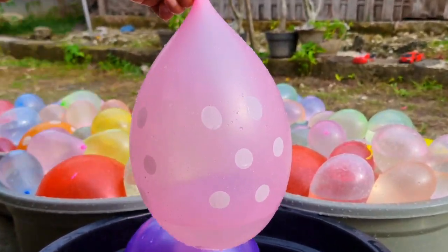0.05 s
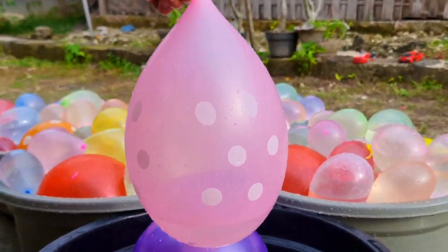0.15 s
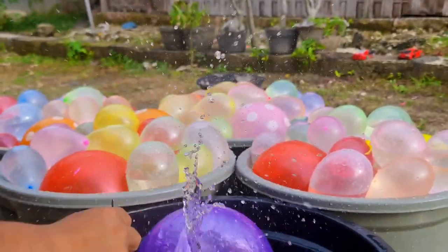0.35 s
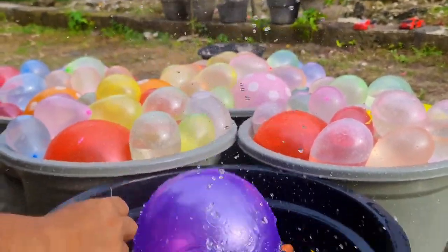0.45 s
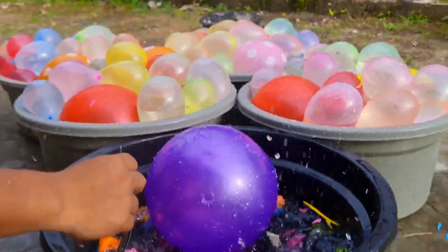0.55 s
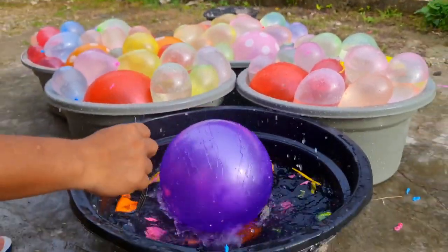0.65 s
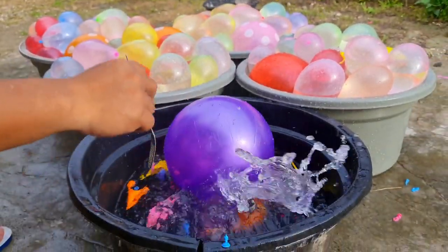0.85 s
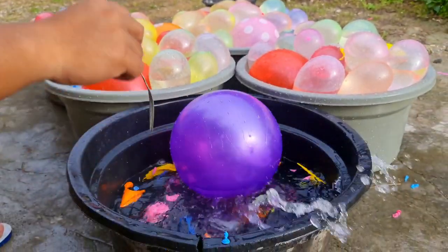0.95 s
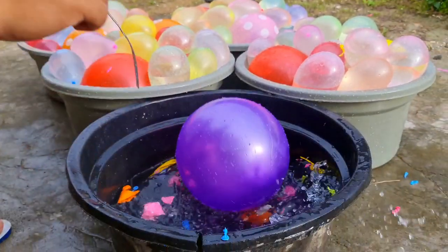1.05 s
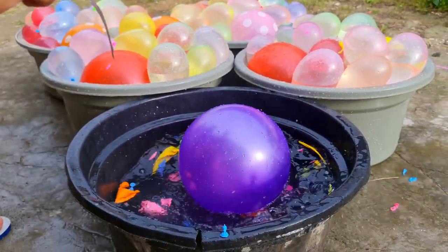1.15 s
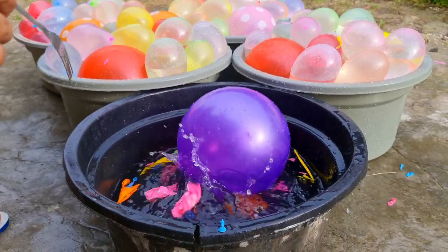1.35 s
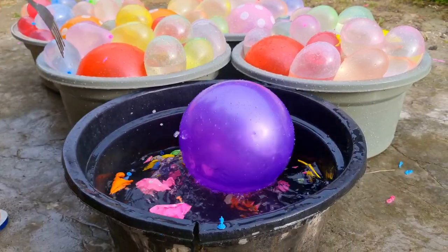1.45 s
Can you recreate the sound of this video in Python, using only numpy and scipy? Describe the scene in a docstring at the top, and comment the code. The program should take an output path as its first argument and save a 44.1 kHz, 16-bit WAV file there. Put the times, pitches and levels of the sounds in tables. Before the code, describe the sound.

Outdoors in a quiet yard, a pricked water balloon tears with a loud clipped pop; its water rushes out, spatters on plastic and ground, bubbles and drips, and a rubber scrap softly thumps an air-filled balloon.

```python
"""Over distant engine drone, faint yard noise and low wind, a pricked water balloon tears and pops in clipped snaps.
Its water gushes out as rumble, roar and hiss: shaped noise and clicks under drawn levels.
It then slaps, splashes, bubbles and drips: swarms of tiny rising sines, plus rumble on an air balloon.
Late on, a scrap of rubber lands on the air balloon, which rings as dying sines. The engine ends lower in pitch.
"""
import sys
import numpy as np
from scipy import signal
from scipy.fft import rfft, irfft
from scipy.io import wavfile
from scipy.ndimage import uniform_filter1d

SR = 44100
rng = np.random.default_rng(int(sys.argv[2]) if len(sys.argv) > 2 else 0)


def bounce(signal):
    """Save signal as a 16-bit WAV file at the path given by the first command-line argument."""
    frames = np.transpose(np.atleast_2d(signal))
    limited = np.clip(frames, -1, 1)
    pcm = np.round(limited * 32767).astype(np.int16)
    wavfile.write(sys.argv[1], SR, pcm)


N = 66150

# spectrum of the splash: freq_hz, rel_db_per_hz
SPLASH_SPECTRUM = [(180, -39), (300, -21), (415, -19.5), (562, -2), (662, -8.5), (887, -5), (1040, -8),
                   (1490, -5), (4000, -16), (5200, -43), (8800, -120)]
# spectrum of spray and hiss: freq_hz, rel_db_per_hz
SPRAY_SPECTRUM = [(880, -20.5), (1500, -9.5), (2150, -15), (3280, -9.5), (4070, -9), (5300, -9),
                  (6200, -8.5), (7990, -15.5), (9500, -16), (12700, -10.5), (15000, -14), (16000, -17.5)]
# spectrum of the water's rumble: freq_hz, rel_db_per_hz
RUMBLE_SPECTRUM = [(35, -24), (60, -0.5), (87, 0.5), (385, -3), (428, -25), (472, -7), (600, -16),
                   (780, -48), (1320, -120)]

# SHARE: power fraction of grains or drops, the rest being plain noise
GRAINS_PER_S, GRAIN_SPREAD_DB, GRAIN_CYCLES, GRAIN_SHARE = 5000, 3, 4, 0.75
DROPS_PER_S, DROP_SPREAD_DB, DROP_SHARE = 3300, 3, 0.75
SPATTER_CYCLES = 2.4
NEAR_LEAN_DB = -3.2


def amp(db):
    """Decibels to amplitude."""
    return 10 ** (np.asarray(db) / 20)


def evened(x):
    """Scales to unit RMS."""
    return x / np.sqrt(np.mean(x ** 2) + 1e-20)


def read(points, hz):
    """Interpolates a table over log frequency."""
    f, value = np.transpose(points)
    return np.interp(np.log(hz + 1), np.log(f + 1), value)


def add(mix, start_s, sound):
    """Adds a sound in place, cut at the end of the mix."""
    part = mix[..., round(start_s * SR):][..., :sound.shape[-1]]
    part += sound[..., :part.shape[-1]]


def ring(modes, length_s, opposed=False):
    """Sum of dying sines; if opposed, every other mode starts in the opposite sense."""
    t = np.arange(round(length_s * SR)) / SR
    out = np.zeros(len(t))
    for k, (hz, db, t60_s) in enumerate(modes):
        sense = (-1) ** (k * opposed)
        out += sense * amp(db - 60 * t / t60_s) * np.sin(2 * np.pi * hz * t)
    return out


def coloured(a, b, spectrum):
    """Colours a source and spreads it over two channels; b is heard on the right only."""
    # likeness of the channels: freq_hz, left_right_correlation
    likeness = [(60, 1), (180, 0.93), (550, 0.093), (1650, 0.069), (4970, 0.0028), (15000, 0.29)]
    # level difference of the channels: freq_hz, left_minus_right_db
    side_lean = [(60, -12), (180, -2.5), (550, -4), (1650, 0.5), (4970, -2), (15000, -3.5)]
    hz = np.fft.rfftfreq(N, 1 / SR)
    same = read(likeness, hz)
    half_lean = amp(read(side_lean, hz) / 2)
    a, b = rfft(a), rfft(b)
    left = a * half_lean
    right = (same * a + np.sqrt(1 - same ** 2) * b) / half_lean
    return evened(irfft(np.array([left, right]) * amp(read(spectrum, hz)), N))


def sparse(per_s, spread_db):
    """Random two-channel clicks of either sign, a few of them large."""
    size = amp(spread_db * np.minimum(rng.exponential(1, (2, N)), 4))
    sign = rng.choice([-1., 1.], (2, N))
    return size * sign * (rng.random((2, N)) < per_s / SR)


def blend(grains, share):
    """Mixes grains with white noise at a given power share."""
    return np.sqrt(share) * evened(grains) + np.sqrt(1 - share) * rng.standard_normal((2, N))


def bubble(hz, rise_oct_per_s, length_s):
    """An air bubble: a sine that swells, dies and climbs in pitch."""
    peak_at = 0.44  # fraction of length_s
    t = np.arange(round(1.7 * length_s * SR)) / SR
    u = (t / (peak_at * length_s)) ** 2
    phase = 2 * np.pi * np.cumsum(hz * 2 ** (rise_oct_per_s * t)) / SR
    return np.sqrt(u * np.exp(1 - u)) * np.sin(phase)


def droplets(per_s, spread_db, cycles, lo_hz, hi_hz):
    """Random tiny bubbles of 24 pitches, each lasting a set number of cycles."""
    clicks = sparse(per_s, spread_db)
    kind = rng.integers(0, 24, (2, N))
    out = np.zeros((2, N))
    for k, hz in enumerate(np.geomspace(lo_hz, hi_hz, num=24)):
        grain = np.sqrt(hz) * bubble(hz, hz / 60, cycles / hz)
        out += signal.oaconvolve(clicks * (kind == k), grain[None], axes=1)[:, :N]
    return out


def tearing_skin():
    """Each tear jolts the skin and water into low ringing, with a short high ring of snapping rubber."""
    # tears: start_s, level_db, sense (only its sign counts: push +, pull -), snap_rel_db
    tears = [(0.2247, -26, 0.5, -10.5), (.231, -14, -1, -10), (0.2339, -12.5, 1, -16),
             (0.2378, -11.5, -1, -2.5), (0.2411, -3, 1, -16), (0.2429, -2, -1, -1.5), (0.2444, -4.5, 1, 6),
             (0.2465, -7, 1, 6), (0.25, -21, 1, 4), (0.259, -21, -1, -8), (.261, -24.5, 1, 7.5),
             (0.264, -20, 1, -8), (0.2786, -16.5, 1, -3), (.287, -15.5, 1, -7)]
    # ringing of skin and water: freq_hz, rel_db, t60_s
    burst_modes = [(73.4, -7.5, 0.093), (188, -5, 0.019), (408, -3.5, .02), (550, -9, 0.018)]
    # ringing of the snapping rubber: freq_hz, rel_db, t60_s
    snap_modes = [(960, -9.5, 0.0084), (1300, -2, 0.011), (1620, -12.5, 0.0088), (3260, -11, 0.0065)]
    out = np.zeros(N)
    burst, snap = ring(burst_modes, 0.15), ring(snap_modes, 0.15)
    for start_s, db, sense, snap_db in tears:
        add(out, start_s, np.sign(sense) * amp(db) * (burst + amp(snap_db) * snap))
    return out


def gush():
    """Water leaves the skin as three bands of clicks and noise: rumble, roar and hiss."""
    # gush levels: time_s, rumble_db, roar_db, hiss_db
    gush_levels = [(0.218, -37.5, -47, -39.5), (0.234, -17, -22.5, -23.5), (0.244, -10.5, -15.5, -9.5),
                   (0.258, -26, -27.5, -17.5), (0.278, -24, -24, -21), (0.308, -26, -34, -30.5),
                   (0.41, -40, -38.5, -41), (0.43, -62.5, -43, -39)]
    # spectrum of the roar: freq_hz, rel_db_per_hz
    roar_spectrum = [(290, -40), (500, -2.5), (687, -4.5), (764, -21), (913, -4.5), (1070, -5.5),
                     (1530, -4.5), (3500, -9), (4550, -39), (7700, -120)]
    time_s, *levels_db = np.transpose(gush_levels)
    t = np.arange(N) / SR
    out = np.zeros((2, N))
    for db, spectrum in zip(levels_db, (RUMBLE_SPECTRUM, roar_spectrum, SPRAY_SPECTRUM)):
        level = amp(np.interp(t, time_s, db, left=-120, right=-120))
        source = blend(sparse(DROPS_PER_S, DROP_SPREAD_DB), DROP_SHARE)
        out += level * coloured(*source, spectrum)
    return out


def slaps():
    """Water slaps hard ground and plastic: short droplet spatters, each with its own side, treble and body."""
    # slaps: start_s, rel_db, t60_s, pan_left_minus_right_db, treble_rel_db, body_rel_db
    slap_events = [(0.3636, -20.5, 0.07, -4, -9, -3), (0.4344, -20, 0.05, -4, -17, 4.5),
                   (0.4402, -21.5, 0.07, -5, -14, 4), (0.4483, -12.5, 0.063, 10.5, -12, -1.5),
                   (0.4556, -11, 0.065, -2, -5.5, -0.5), (0.5102, -21, 0.036, 2, 4, 1),
                   (0.5516, -15.5, 0.044, 2, -8.5, 0), (0.5616, -23.5, 0.045, 4, -18, 9),
                   (0.5836, -19, 0.046, 9, -12, -1), (0.618, -19.5, 0.068, 0, -9, -7),
                   (0.6438, -19, 0.059, 5, -7, -14), (0.6834, -13, 0.048, 5.5, -27, -3.5),
                   (0.699, -22, 0.045, 7, -20, -5), (0.724, -26, 0.077, 1.0, -16, -8),
                   (0.8844, -46, 0.04, -13, 6, -2), (0.9169, -27.5, 0.05, 1, -4, 0.5),
                   (0.9483, -36, 0.05, -2, 2, -7), (0.9692, -33.5, 0.047, 1.0, -17, 1.5),
                   (0.989, -26.5, 0.088, 6, -1.5, -14), (1.0087, -25, 0.073, -4, 1, -5),
                   (1.0224, -22, 0.052, 8.5, -9, -15), (1.0594, -31.5, 0.046, 0, -9, -5),
                   (1.0859, -41, 0.05, 2, -3, -8), (1.1154, -24.5, 0.054, -12, -7.5, -29),
                   (1.125, -28, 0.043, 13, 2, -29), (1.1476, -19.5, 0.048, -6.5, -3, -29),
                   (1.1543, -26.5, 0.041, -1, -11, -29), (1.1615, -27, 0.058, -1.5, 2, -23),
                   (1.2337, -26, 0.059, 2, -5.5, 4.5), (1.289, -28.5, 0.058, 5, -8, -12),
                   (1.2986, -35, 0.054, -4, -2, -12), (1.377, -35, 0.067, 6, -5, -7),
                   (1.396, -30, 0.05, -0.5, -3.5, -9), (1.412, -34.5, 0.059, 7, -6, -7),
                   (1.45, -37, 0.046, -2.0, -16, 0.5)]
    trim_db, rise_s = -7.5, 0.0028
    tick_db, tick_s = -1.5, 0.0006  # first contact
    spatter_per_s, spread_db, share, treble_hz = 4000, 4, 0.77, 8200
    env = np.zeros((3, 2, N))  # dull part, treble, body
    t = np.arange(SR // 5) / SR
    onset = np.minimum(t / rise_s, 1) + amp(tick_db) * np.exp(-t / tick_s)
    for start_s, db, t60_s, pan_db, treble_db, body_db in slap_events:
        shape = onset * amp(db + trim_db - 60 * t / t60_s)
        shape = shape * amp([[pan_db / 2], [-pan_db / 2]])
        add(env, start_s, shape * amp([[[0]], [[treble_db]], [[body_db]]]))
    spatter = droplets(spatter_per_s, spread_db, SPATTER_CYCLES, 2360, 15700)
    spatter = coloured(*blend(spatter, share), SPRAY_SPECTRUM)
    lowpass = 1 / (1 + (np.fft.rfftfreq(N, 1 / SR) / treble_hz) ** 8)
    dull = irfft(rfft(spatter) * lowpass, N)
    treble = evened(spatter - dull)
    body = droplets(GRAINS_PER_S, spread_db, GRAIN_CYCLES, 602, 3080)
    body = coloured(*blend(body, share), SPLASH_SPECTRUM)
    return env[0] * dull + env[1] * treble + env[2] * body


def falling_water():
    """Tiny bubbles in the splash with a pool resonance, ticking spray, and rumble on the air balloon."""
    # falling water levels: time_s, splash_db, rumble_db, spray_db
    water_levels = [(.4, -43, -49, -43), (.47, -27.5, -34, -33.5), (.53, -30.5, -38.5, -36),
                    (.58, -27, -37, -34.5), (.62, -28.5, -40.5, -32.5), (.708, -29, -44.5, -34),
                    (0.738, -29.5, -42, -43.5), (.77, -43, -53, -52), (.83, -51, -56, -52),
                    (.9, -53, -55.5, -49.5), (.95, -53, -57, -48.5), (.985, -42.5, -50, -43.5),
                    (1.03, -43, -41.5, -41.5), (1.05, -45.5, -48, -44.5), (1.08, -45.5, -52.5, -50.5),
                    (1.11, -51.5, -58, -45), (1.165, -55, -62, -45), (1.192, -56, -68, -42.5),
                    (1.205, -57, -62, -50), (1.228, -53, -60, -46.5), (1.27, -48.5, -56, -56),
                    (1.34, -60.5, -52.5, -64), (1.4, -58, -65, -55.5), (1.5, -58, -53, -56.5)]
    gurgles_per_s, gurgle_cycles, gurgle_db = 400, 10, -1
    pool_hz, pool_width_hz, pool_db = 570, 110, -14.5
    time_s, splash_db, rumble_db, spray_db = np.transpose(water_levels)
    t = np.arange(N) / SR

    def level(db):
        """Interpolates a level in dB, silent before the first point."""
        return amp(np.interp(t, time_s, db, left=-120))

    grains = evened(droplets(GRAINS_PER_S, GRAIN_SPREAD_DB, GRAIN_CYCLES, 354, 3980))
    gurgles = evened(droplets(gurgles_per_s, GRAIN_SPREAD_DB, gurgle_cycles, 500, 2593))
    splash = coloured(*blend(grains + amp(gurgle_db) * gurgles, GRAIN_SHARE), SPLASH_SPECTRUM)
    r = np.exp(-np.pi * pool_width_hz / SR)
    resonator = [1, -2 * r * np.cos(2 * np.pi * pool_hz / SR), r * r]
    pool = evened(signal.lfilter([1], resonator, splash.mean(0)))
    drops = droplets(DROPS_PER_S, DROP_SPREAD_DB, SPATTER_CYCLES, 1510, 16600)
    spray = coloured(*blend(drops, DROP_SHARE), SPRAY_SPECTRUM)
    rumble = coloured(*rng.standard_normal((2, N)), RUMBLE_SPECTRUM)
    wet = level(splash_db) * (splash + amp(pool_db) * pool)
    return wet + level(spray_db) * spray + level(rumble_db) * rumble


def single_bubbles():
    """Separate bubbles, each a rising sine, made uneven by smoothed noise."""
    # bubbles: start_s, peak_db, start_hz, rise_oct_per_s, length_s
    bubble_events = [(0.435, -22, 1120, 2.7, .004), (0.456, -8, 1744, 3., .0022),
                     (0.4611, -9.5, 562, 1.2, 0.0086), (0.5145, -14, 884, 1.2, 0.01),
                     (0.567, -14.5, 1460, 3.8, 0.0023), (0.571, -23.5, 895, 2.2, 0.014),
                     (0.6851, -17, 1220, 3.5, 0.0023), (.688, -25.5, 582, 1.8, 0.011),
                     (.722, -26, 1300, 2.6, 0.0046), (0.764, -36.5, 2070, 3., 0.0076),
                     (0.917, -33.5, 1790, 4.3, 0.0037), (.921, -36, 1910, 3., .013),
                     (0.966, -36, 608, 3., 0.01), (0.974, -38.5, 986, 40, .02),
                     (.972, -36.5, 890, 5., 0.0072), (0.974, -39.5, 3660, 3., 0.0063),
                     (0.979, -38, 3100, 5., 0.0064), (0.997, -35, 555, 2.3, 0.021),
                     (1.002, -37, 1730, 3., .008), (1.025, -33, 1300, 3., 0.0061),
                     (1.069, -38, 914, 3., 0.008), (1.006, -30.5, 1164, 60, .02),
                     (1.061, -36.5, 570, 2.3, .016), (1.085, -38.5, 2300, 3.03, .005),
                     (1.096, -39, 1855, 6.3, 0.013), (1.169, -39, 3400, 3.3, 0.0067),
                     (1.21, -41.5, 1695, 4.1, 0.012), (1.253, -45.5, 867, 22., 0.031),
                     (1.29, -43.5, 1300, 2.1, .012), (1.381, -42, 1470, 6.3, 0.0091),
                     (1.407, -37, 1210, 3.7, 0.0078), (1.425, -41.5, 3356, 2.3, 0.01),
                     (1.449, -45, 2207, 2.3, .01)]
    wobble_depth, wobble_s = 0.29, 0.0012
    out = np.zeros(N)
    for start_s, db, hz, rise_oct_per_s, length_s in bubble_events:
        add(out, start_s, amp(db) * bubble(hz, rise_oct_per_s, length_s))
    wobble = evened(uniform_filter1d(rng.standard_normal(N), round(wobble_s * SR)))
    return out * (1 + wobble_depth * wobble)


def landing_scrap():
    """A scrap of rubber gives the air balloon a soft push; its modes ring in alternating sense."""
    # air balloon modes: freq_hz, rel_db, t60_s
    balloon_modes = [(185, -2, .1), (232, 0, .14), (361, -17, .12), (640, -8, .03), (1150, -9, .05),
                     (1750, -17, .04)]
    start_s, level_db, push_s = 1.2346, -16.5, 0.00047
    out = np.zeros(N)
    push = np.hanning(round(2 * push_s * SR))
    hit = np.convolve(ring(balloon_modes, 0.25, opposed=True), push / push.sum())
    add(out, start_s, -amp(level_db) * hit)
    return out


def echoes(x):
    """Short scatter from tubs and ground: dying noise taps, different in each channel."""
    level_db, t60_s = -14, 0.07
    t = np.arange(SR // 5) / SR
    taps = rng.standard_normal((2, len(t))) * amp(-60 * t / t60_s) * (t > 0.002)
    taps /= np.linalg.norm(taps[0])
    return amp(level_db) * signal.fftconvolve(x[None], taps, axes=1)[:, :N]


def engine():
    """Far engine: a gliding sine blurred by slow complex noise."""
    # engine course: time_s, pitch_hz, level_db
    engine_course = [(0, 111.7, -50), (.1, 118.2, -50.5), (.19, 106.2, -40), (.45, 104.4, -47),
                     (.63, 104.9, -56), (.76, 100.5, -52.5), (.9, 98.97, -52), (1.0, 80.2, -57),
                     (1.1, 72.54, -57), (1.26, 76.1, -57), (1.36, 75.85, -46), (1.45, 83, -54.5),
                     (1.5, 79, -42)]
    width_hz, fuzz_depth = 5.2, 0.51
    time_s, hz, db = np.transpose(engine_course)
    t = np.arange(N) / SR
    r = np.exp(-np.pi * width_hz / SR)
    fuzz = evened(signal.lfilter([1 - r], [1, -r], rng.standard_normal((2, N))))
    turn = np.exp(2j * np.pi * np.cumsum(np.interp(t, time_s, hz)) / SR)
    drone = (turn * (1 + fuzz_depth * (fuzz[0] + 1j * fuzz[1]))).real
    return np.sqrt(2) * amp(np.interp(t, time_s, db)) * drone


def whines():
    """Distant steady sines."""
    # whines: freq_hz, level_db
    whine_tones = [(950, -69), (995, -78), (1027, -73), (1049, -60)]
    t = np.arange(N) / SR
    return sum(amp(db) * np.sin(2 * np.pi * (hz * t + rng.random())) for hz, db in whine_tones)


def yard_noise():
    """Wide, steady coloured noise."""
    # yard spectrum: freq_hz, rel_db_per_hz
    yard_spectrum = [(82, -22.5), (140, -27), (170, -38), (300, -24), (430, -24), (560, -24.5), (900, -30),
                     (1020, -23.5), (1200, -31.5), (2500, -36.5), (3400, -29.5), (4300, -37), (7000, -40),
                     (9000, -53.5), (12000, -51), (16000, -56)]
    level_db = -53.5
    return amp(level_db) * coloured(*rng.standard_normal((2, N)), yard_spectrum)


def wind():
    """Low lumpy air on the microphone: band-passed noise, stronger on the right."""
    level_db, low_hz, high_hz = -47.5, 25, 67.5
    band = signal.butter(2, [low_hz, high_hz], "bandpass", fs=SR, output="sos")
    air = evened(signal.sosfilt(band, rng.standard_normal(N)))
    return amp(level_db) * air * amp([[NEAR_LEAN_DB], [-NEAR_LEAN_DB]])


def scene():
    """Sums the near knocks with their echoes, the water and the background."""
    near = tearing_skin() + single_bubbles() + landing_scrap()
    direct = near * amp([[NEAR_LEAN_DB / 2], [-NEAR_LEAN_DB / 2]])
    water = gush() + slaps() + falling_water()
    background = engine() + whines() + yard_noise() + wind()
    return direct + echoes(near) + water + background


def record(dry):
    """Microphone: bass roll-off, hard clipping, then the band limit."""
    low_cut_hz, clip, edge_hz = 51.7, 0.96, 15740
    highpass = signal.butter(2, low_cut_hz, "highpass", fs=SR, output="sos")
    clipped = np.clip(signal.sosfilt(highpass, dry), -clip, clip)
    lowpass = signal.firwin(511, edge_hz, window=("kaiser", 9), fs=SR)
    return signal.oaconvolve(clipped, lowpass[None], "same")


dry = scene()
out = record(dry)
bounce(out)
```